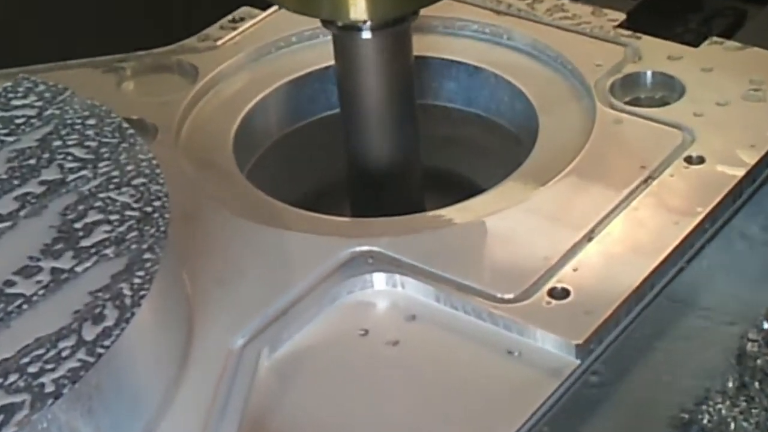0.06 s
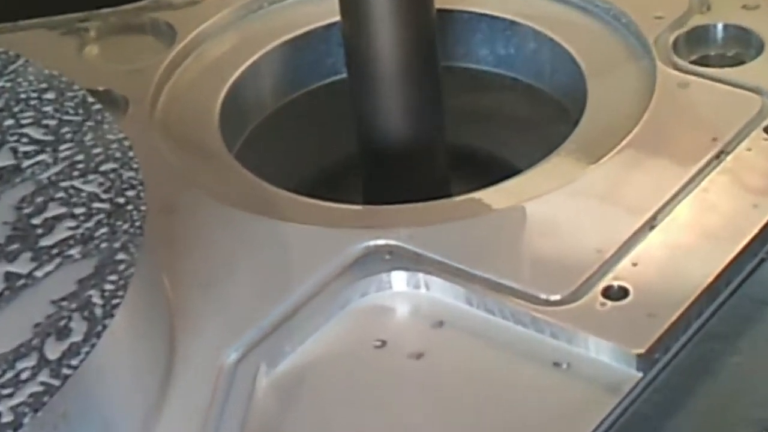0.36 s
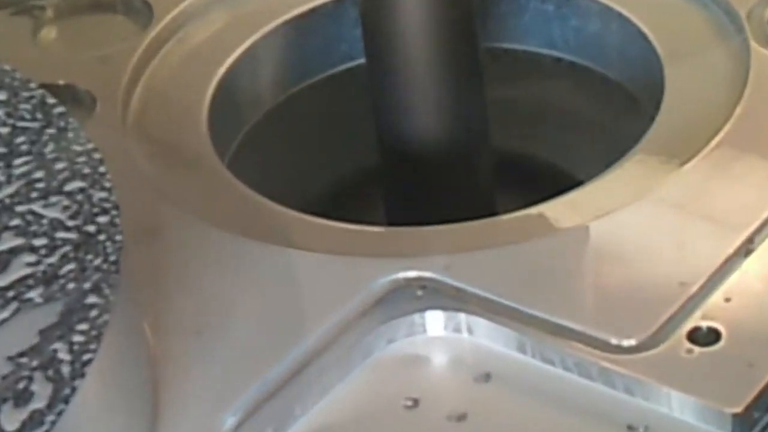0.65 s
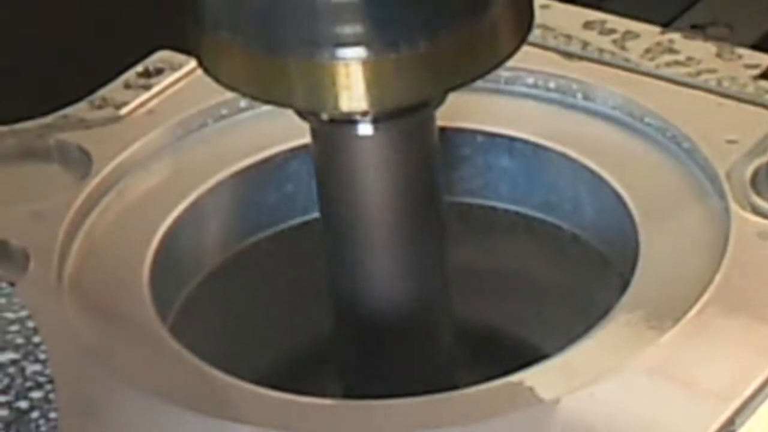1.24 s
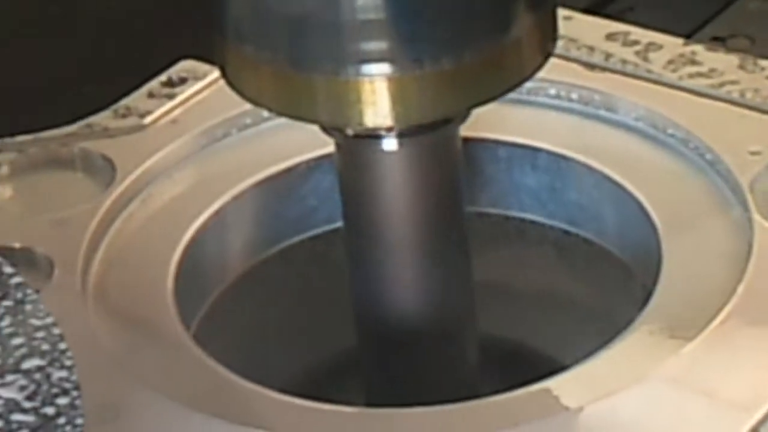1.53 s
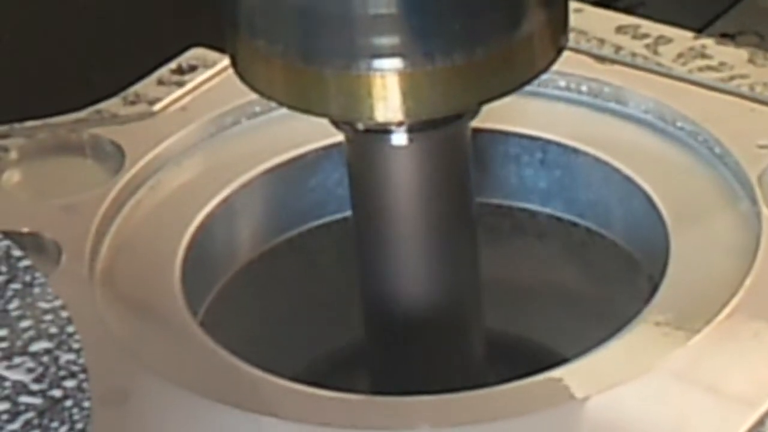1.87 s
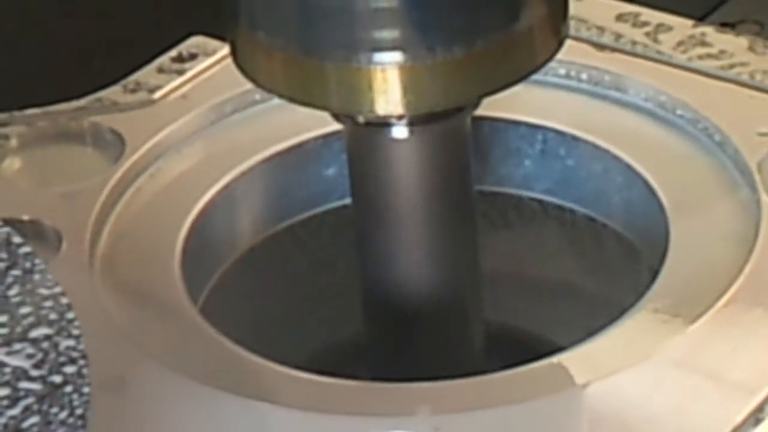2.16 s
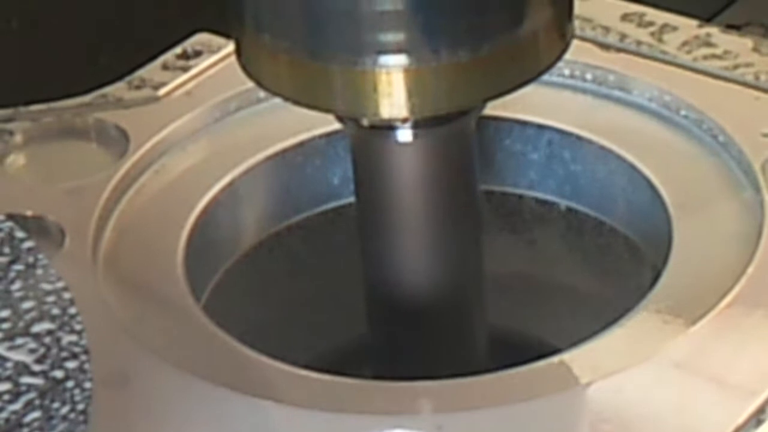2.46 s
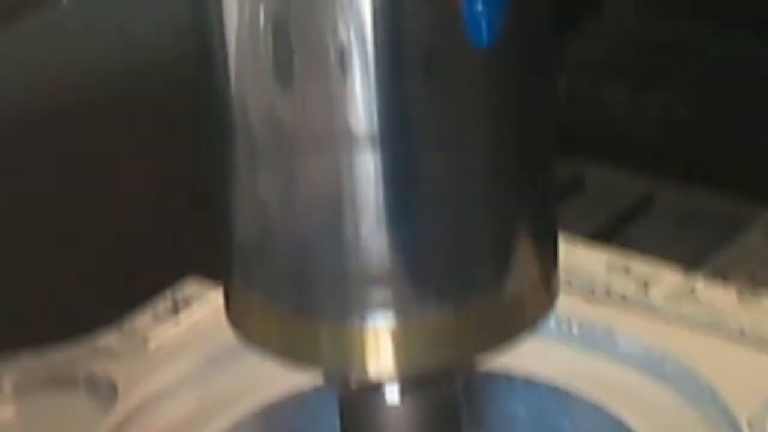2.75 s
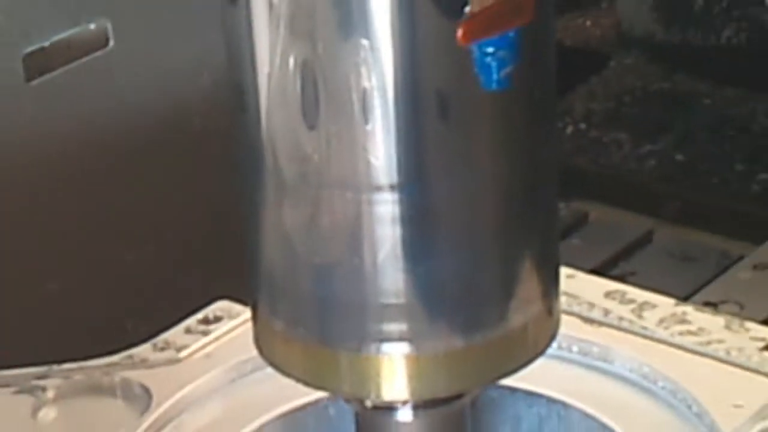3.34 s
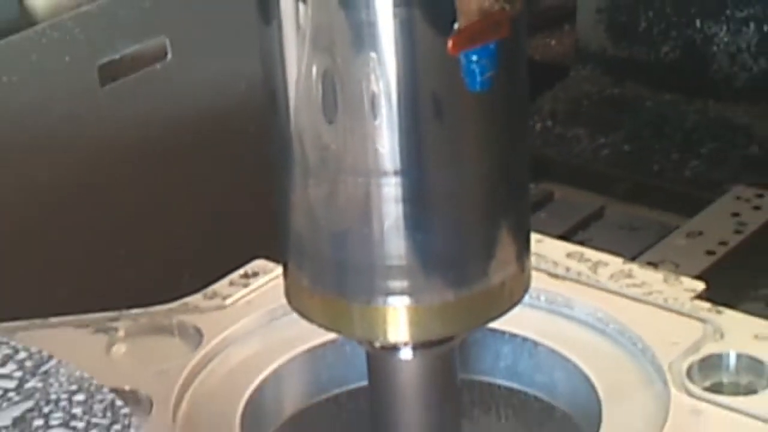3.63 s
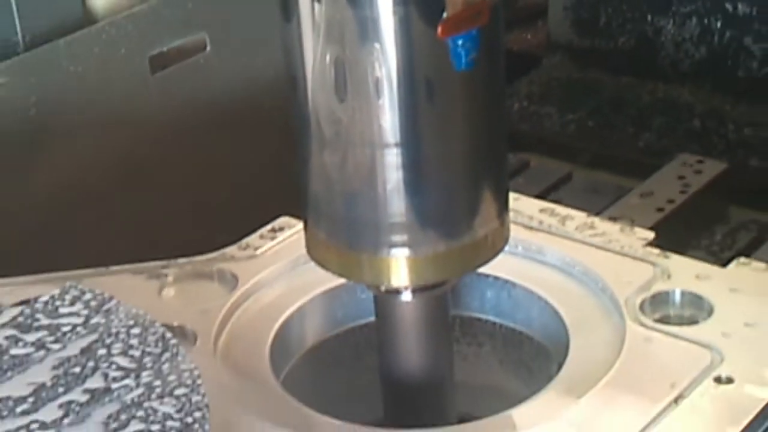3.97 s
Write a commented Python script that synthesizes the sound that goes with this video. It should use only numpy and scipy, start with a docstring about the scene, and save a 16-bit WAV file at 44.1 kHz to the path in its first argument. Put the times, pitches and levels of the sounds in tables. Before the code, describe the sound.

A milling cutter hisses steadily through metal over the hum of the machine.

```python
"""A milling cutter hisses in the bore of a metal part.
The cut keeps tool and part ringing and whistles faintly. The spindle drive hums, motors and gears
whine, and the frame rumbles and bumps twice. A few chips ping and tick against the metal.
The overall level wanders and flutters. One close, narrow-band microphone."""
import sys
import numpy as np
from scipy.fft import rfft, irfft, next_fast_len
from scipy.io import wavfile
from scipy.ndimage import map_coordinates

SR = 44100
rng = np.random.default_rng(int(sys.argv[2]) if len(sys.argv) > 2 else 0)


def transcribe(u):
    """Save the signal u as a 16-bit wav file named by the first command-line argument.

    u: samples, shape (n,) or (channels, n), limited to [-1, 1]; the rate is SR.
    q: integer samples, one column per channel.
    """
    v = np.clip(np.atleast_2d(u).T, -1, 1)
    q = np.round(v * 32767).astype(np.int16)
    wavfile.write(sys.argv[1], SR, q)


N = 176400


def amp(db):
    """Decibels to gain."""
    return 10 ** (np.asarray(db) / 20)


def unit(x):
    """Scale to rms 1."""
    return x / np.sqrt(np.mean(x ** 2) + 1e-20)


def curve(rows):
    """(time [s], value) rows to one value per sample."""
    return np.interp(np.arange(N) / SR, *np.transpose(rows))


def wobble(knots_per_s):
    """Smooth random curve, rms near 1."""
    knots = rng.standard_normal(4096)
    return map_coordinates(knots, [np.arange(N) * knots_per_s / SR], mode="wrap")


def filtered(x, response):
    """Filter x by the gain response(hz)."""
    size = next_fast_len(N + SR // 2)
    return irfft(rfft(x, size) * response(np.fft.rfftfreq(size, 1 / SR)), size)[:N]


def coloured(x, colour):
    """Filter x by (frequency [Hz], gain [dB]) rows."""
    points_hz, gains_db = np.transpose(colour)
    return filtered(x, lambda hz: amp(np.interp(np.log(hz + 1), np.log(points_hz), gains_db)))


def noise(colour):
    """Coloured noise, rms 1."""
    return unit(coloured(rng.standard_normal(N), colour))


def ringing(centre_hz, half_width_hz):
    """Noise-driven resonance, rms 1."""
    excitation = rng.standard_normal(N)
    return unit(filtered(excitation, lambda hz: 1 / (1 + ((hz - centre_hz) / half_width_hz) ** 2)))


def tone(hz, drift_hz):
    """Sine with wandering pitch, rms 1."""
    cycles = np.cumsum(hz + drift_hz * wobble(8)) / SR
    return unit(np.sin(2 * np.pi * (cycles + rng.random())))


def decay(start_s, attack_s, t60_s):
    """Impact envelope: quick rise, exponential fall."""
    age_s = np.maximum(np.arange(N) / SR - start_s, 0)
    return (1 - np.exp(-age_s / attack_s)) * np.exp(-np.log(1000) * age_s / t60_s)


def cut(level_db):
    """The cut hisses with a fine grain and keeps tool and part ringing."""
    # (frequency [Hz], relative density [dB])
    hiss_colour = [(600, -38), (1500, -12.5), (2100, -10.5), (2450, -6), (2900, -5), (3100, -2.5),
                   (3430, -3), (3680, -0.5), (3900, -1.7), (4400, -0.5), (4800, -0.5), (6300, 1),
                   (6850, -1), (7300, -6.5), (7650, -16.5), (7950, -34), (8500, -26), (9100, -41)]
    # tool and part modes (frequency [Hz], half-width [Hz], level re hiss [dB])
    modes = [(2470, 73, -29.5), (3640, 91, -20), (3710, 50, -22)]
    grain_db, waver_db = 0.35, 1.2
    hiss = amp(grain_db * wobble(600)) * noise(hiss_colour)
    rings = sum(amp(db + waver_db * wobble(9)) * ringing(hz, width_hz) for hz, width_hz, db in modes)
    return amp(level_db) * (hiss + rings)


def cutter_whistle():
    """The cutter whistles thinly at one narrow resonance."""
    # (time [s], level [dB])
    levels = [(0, -45), (1.1, -46), (1.5, -39), (1.9, -44), (2.3, -47), (4, -45.5)]
    return amp(curve(levels)) * ringing(4464, half_width_hz=20)


def spindle_hum():
    """The spindle drive hums on two strong, uneven tones."""
    # (time [s], level before trim [dB])
    low_levels = [(0.0, -37), (0.46, -25.5), (0.6, -37.5), (1.12, -25.5), (1.31, -35), (1.4, -26.5),
                  (1.85, -28.5), (1.98, -47), (2.12, -25.5), (2.43, -25), (2.55, -31.5), (3.01, -27),
                  (3.32, -36), (3.44, -21.5), (3.64, -34.5), (4.0, -27)]
    high_levels = [(0.0, -27), (0.28, -25.5), (0.52, -32), (0.85, -26), (1.15, -35), (1.53, -25),
                   (1.93, -40), (1.96, -27), (2.22, -27.5), (2.62, -31), (2.67, -43), (2.86, -25.5),
                   (3.16, -37), (3.58, -28), (3.79, -30), (3.82, -46), (3.94, -30), (4.0, -43)]
    low_trim_db, high_trim_db, rough_db = 0.53, -0.8, 0.6
    low_db = curve(low_levels) + low_trim_db + rough_db * wobble(35)
    high_db = curve(high_levels) + high_trim_db + rough_db * wobble(35)
    return amp(low_db) * tone(175.8, drift_hz=0.85) + amp(high_db) * tone(267.5, drift_hz=0.85)


def gear_whine(wander_db):
    """Motors and gears give weaker, wavering tones that partly follow the overall level."""
    # (frequency [Hz], base level [dB])
    tones = [(61, -52.5), (106.5, -42.5), (246.5, -38.5), (350, -41.5), (364, -43), (496, -41.5),
             (532, -43), (728, -38.5), (773, -47), (804.5, -41.5), (1070, -44.5), (1136.2, -38),
             (1238, -53.5), (1336, -46.5), (1546, -55.5), (1942, -52.5), (2083, -50.5)]
    waver_db = 1.5
    whine = sum(amp(db + waver_db * wobble(5.87)) * tone(hz, drift_hz=1.26) for hz, db in tones)
    return amp(0.75 * wander_db) * whine


def frame_rumble(wander_db):
    """The frame rumbles and churns, rising and falling with the overall level."""
    # (frequency [Hz], relative density [dB])
    rumble_colour = [(20, -16.5), (50, -8), (90, -8), (112, -2.5), (130, -5.5), (158, 0.5), (210, -2),
                     (250, 2), (295, 1), (325, -4.5), (375, -1.5), (430, -3.5), (600, -14), (1000, -35),
                     (2000, -65)]
    churn_colour = [(200, -27), (400, -7.5), (520, 0.5), (640, -3), (850, -1), (1100, -2), (1300, -6.5),
                    (1600, -11), (2400, -10.5), (4000, -31), (8000, -54.5)]
    rumble_db = -27.5 + wander_db + 1.5 * wobble(14)
    churn_db = -29 + wander_db + 1.4 * wobble(120)
    return amp(rumble_db) * noise(rumble_colour) + amp(churn_db) * noise(churn_colour)


def chip_pings():
    """Chips strike the metal and ring briefly."""
    # (time [s], frequency [Hz], gain [dB])
    pings = [(.838, 2360, -15.5), (3.496, 1705, -18)]
    return sum(amp(db) * decay(start_s, attack_s=0.0023, t60_s=0.027) * tone(hz, drift_hz=5)
               for start_s, hz, db in pings)


def chip_ticks():
    """Chips hit the part: each a sharp contact and a short rattle."""
    # (time [s], peak [dB])
    ticks = [(.8875, -10.5), (.9495, -6), (1.308, -13.5)]
    # (frequency [Hz], relative gain [dB])
    tick_colour = [(200, -18), (700, -1.5), (1100, -2.5), (2000, 0), (3500, -16.5), (8000, -27.5)]
    sound = np.zeros(N)
    for start_s, peak_db in ticks:
        blow = 0.07 * decay(start_s, attack_s=0.0005, t60_s=0.02) * rng.standard_normal(N)  # rattle
        blow[round(start_s * SR)] += 1  # contact
        tick = coloured(blow, tick_colour)
        sound += amp(peak_db) * tick / np.abs(tick).max()
    return sound


def frame_bumps():
    """The frame bumps dully: low, damped tones."""
    # (time [s], frequency [Hz], gain [dB])
    bumps = [(1.575, 108.1, -23), (1.614, 96.1, -20)]
    return sum(amp(db) * decay(start_s, attack_s=0.0043, t60_s=0.08) * tone(hz, drift_hz=3.53)
               for start_s, hz, db in bumps)


def scene():
    """The overall level wanders: hiss, ringing, whine and rumble swell and dip together."""
    # (time [s], level [dB])
    hiss_levels = [(0.0, -21.1), (0.09, -20.5), (0.13, -23.5), (0.2, -23.2), (0.24, -20), (0.33, -23.5),
                   (0.37, -22.5), (0.49, -24.5), (0.6, -21), (0.75, -23), (0.79, -21.5), (0.98, -21.5),
                   (1.05, -21.5), (1.18, -24), (1.37, -20.9), (1.43, -24.5), (1.51, -21.5), (1.72, -23.5),
                   (1.82, -22), (1.88, -23.5), (1.97, -21.5), (2.04, -22.5), (2.1, -21), (2.31, -24.5),
                   (2.47, -23.5), (2.57, -20.0), (2.68, -23.5), (2.72, -22), (2.8, -23.5), (2.83, -22.5),
                   (3.0, -21.8), (3.07, -23), (3.31, -19.8), (3.36, -23), (3.49, -21.5), (3.56, -23.5),
                   (3.61, -21.5), (3.77, -22.5), (3.83, -22), (3.99, -20.3)]
    flutter_db = 1.17
    level_db = curve(hiss_levels) + flutter_db * wobble(65)
    wander_db = level_db - level_db.mean()
    cutter = cut(level_db) + cutter_whistle()
    machine = spindle_hum() + gear_whine(wander_db) + frame_rumble(wander_db)
    impacts = chip_pings() + chip_ticks() + frame_bumps()
    mono = cutter + machine + impacts
    return np.array([mono, mono])


def record(dry):
    """Brick-wall low-pass and a small DC offset."""
    cutoff_hz, dc_offset = 9100, -0.016
    return dc_offset + np.array([filtered(channel, lambda hz: hz < cutoff_hz) for channel in dry])


dry = scene()
out = record(dry)
transcribe(out)
```